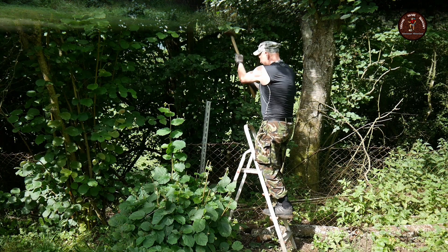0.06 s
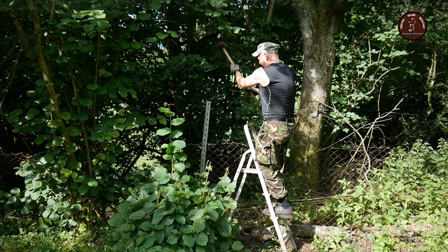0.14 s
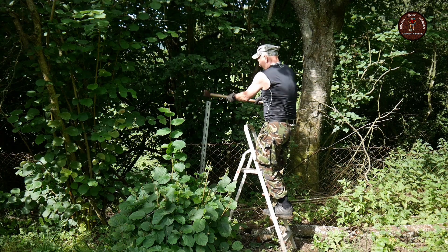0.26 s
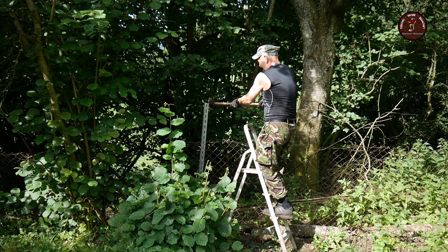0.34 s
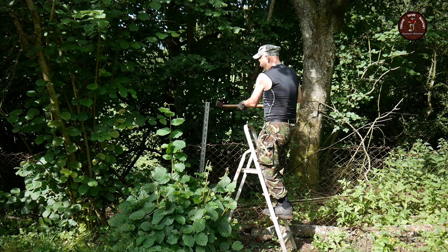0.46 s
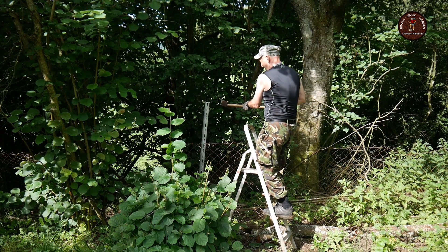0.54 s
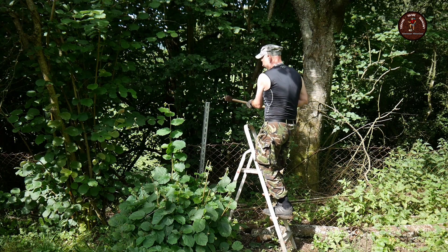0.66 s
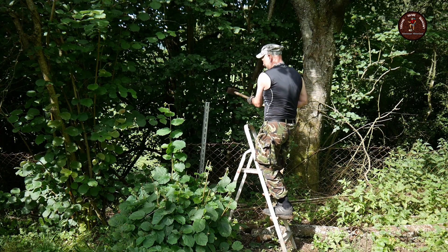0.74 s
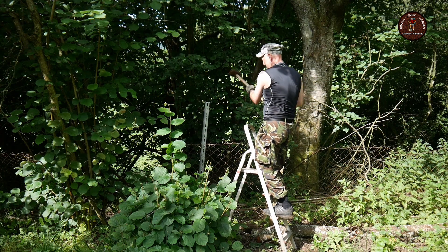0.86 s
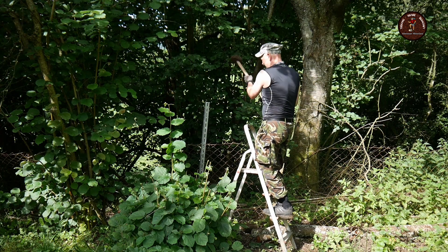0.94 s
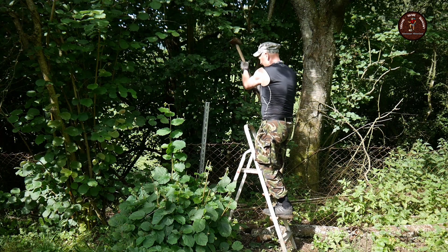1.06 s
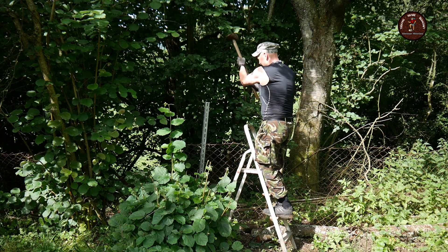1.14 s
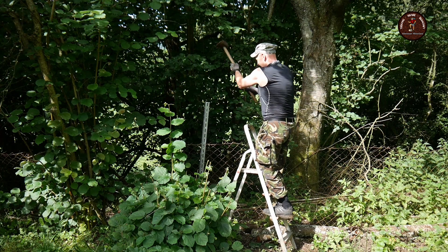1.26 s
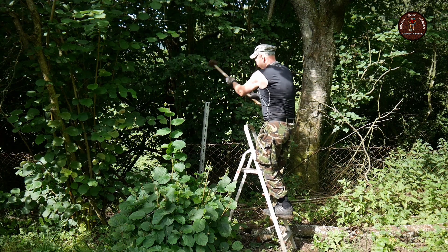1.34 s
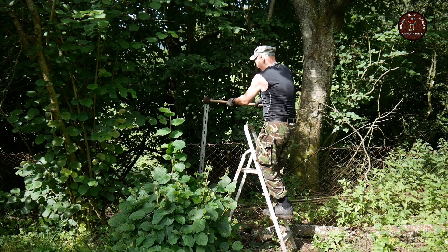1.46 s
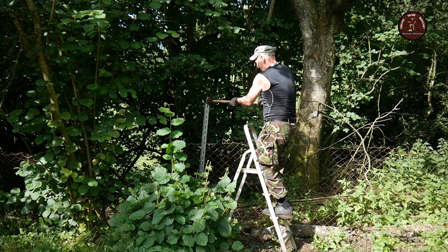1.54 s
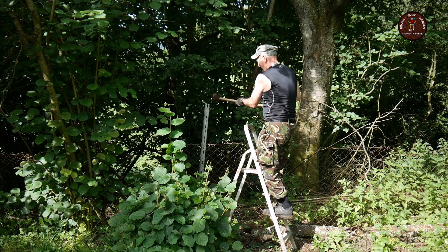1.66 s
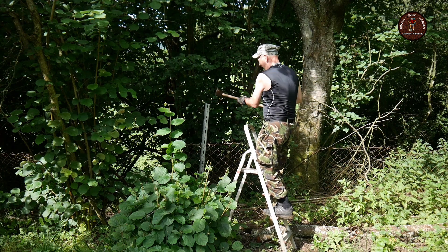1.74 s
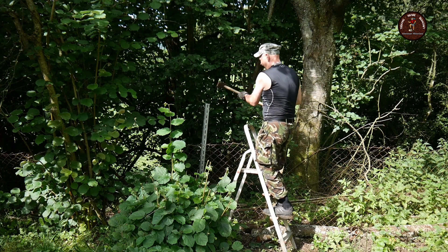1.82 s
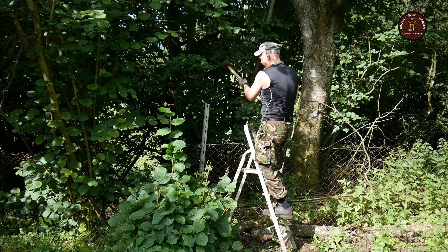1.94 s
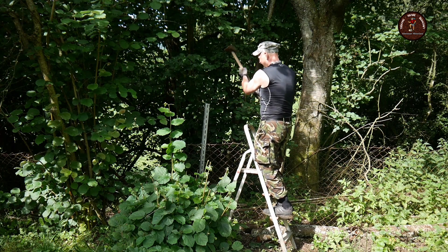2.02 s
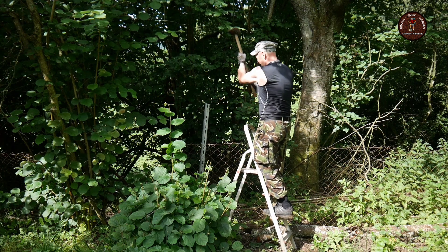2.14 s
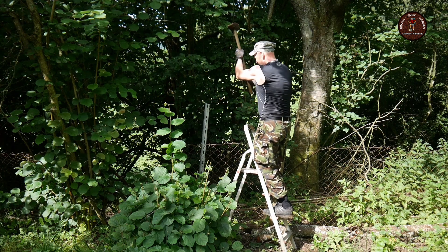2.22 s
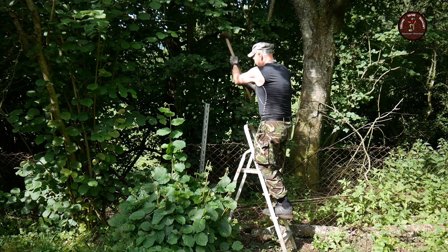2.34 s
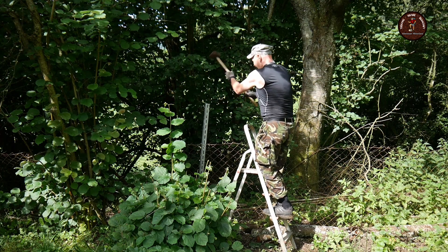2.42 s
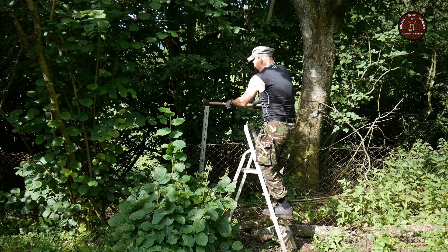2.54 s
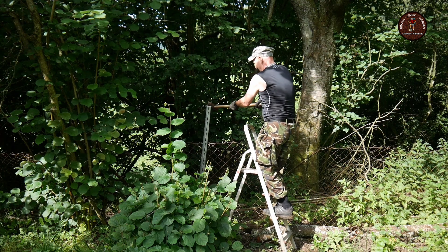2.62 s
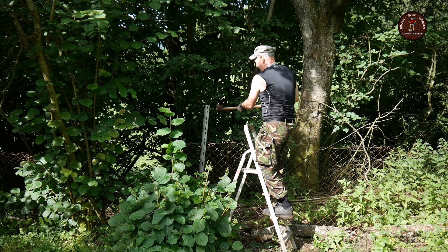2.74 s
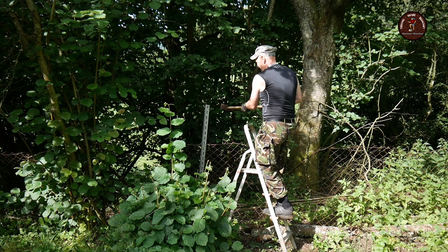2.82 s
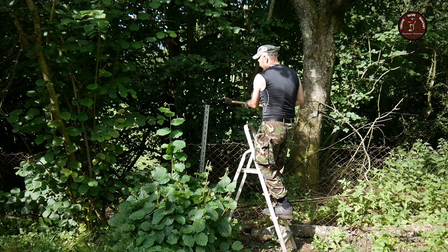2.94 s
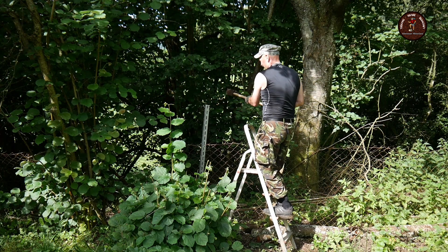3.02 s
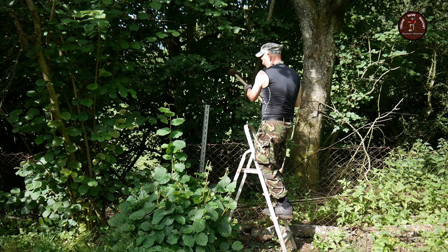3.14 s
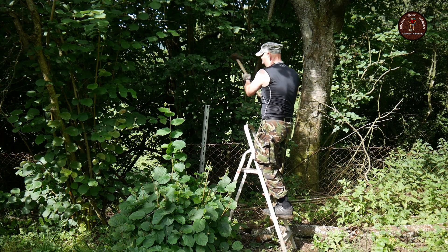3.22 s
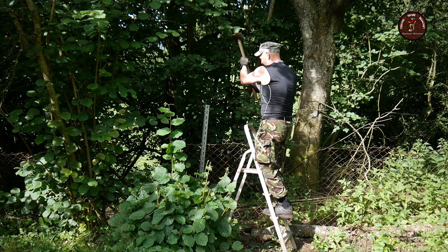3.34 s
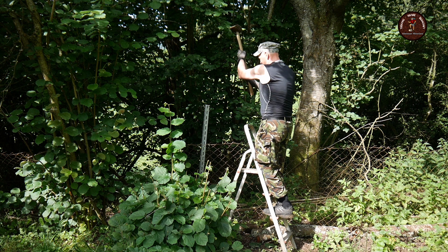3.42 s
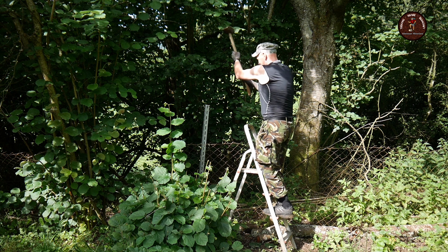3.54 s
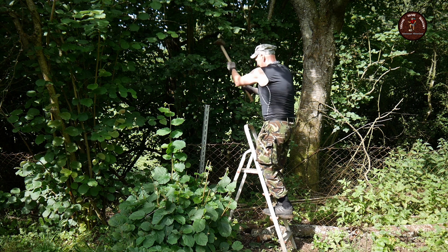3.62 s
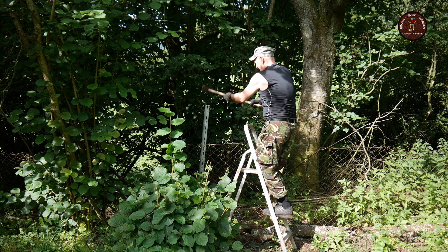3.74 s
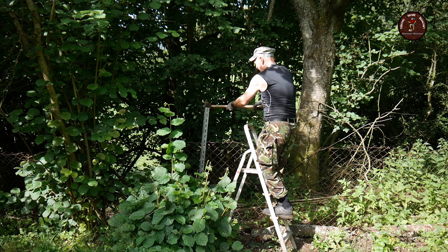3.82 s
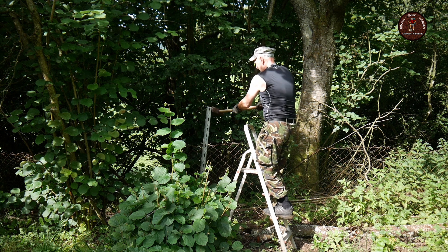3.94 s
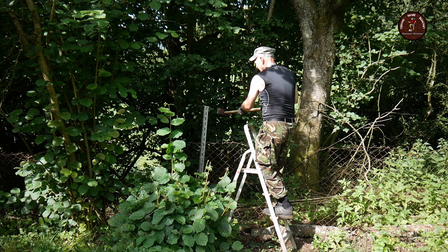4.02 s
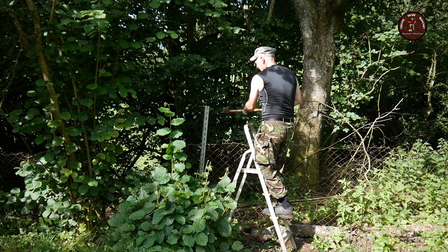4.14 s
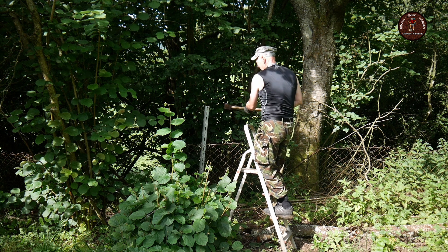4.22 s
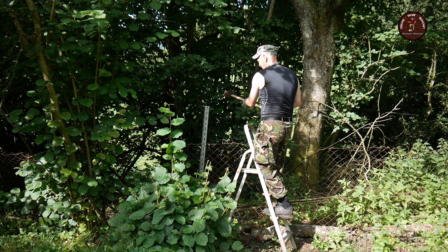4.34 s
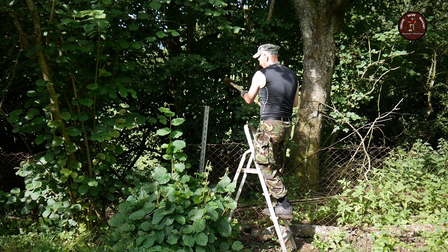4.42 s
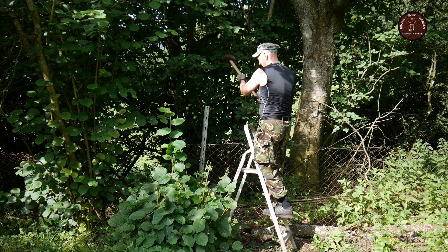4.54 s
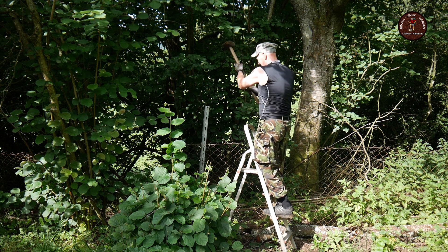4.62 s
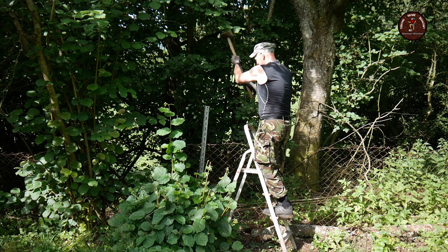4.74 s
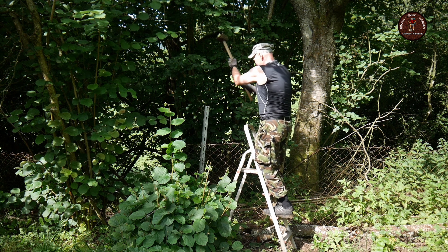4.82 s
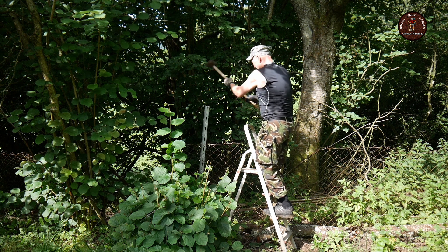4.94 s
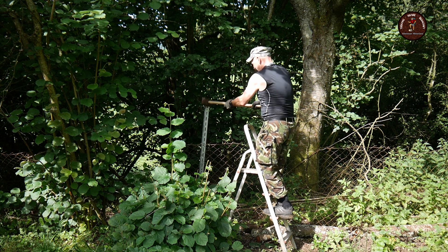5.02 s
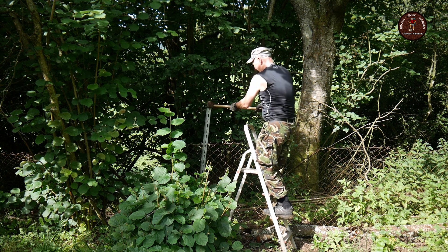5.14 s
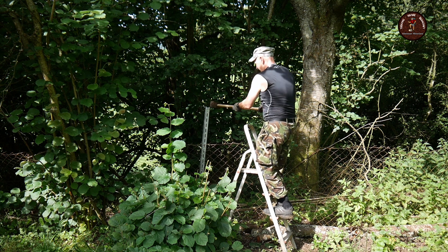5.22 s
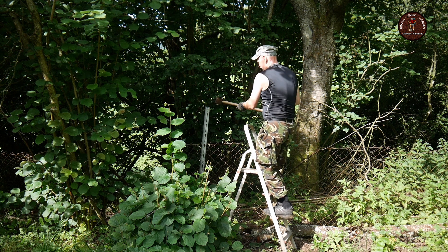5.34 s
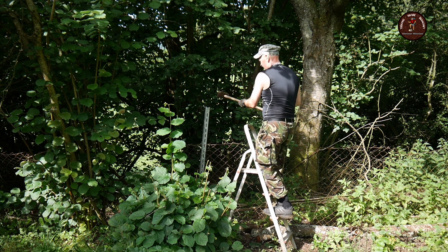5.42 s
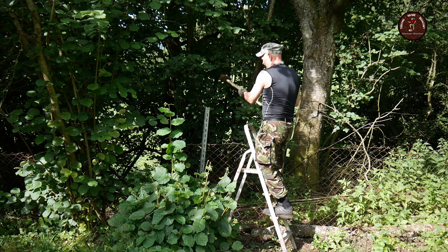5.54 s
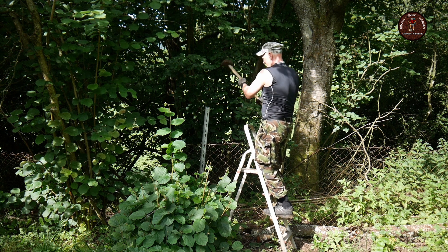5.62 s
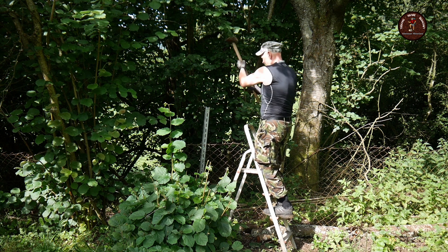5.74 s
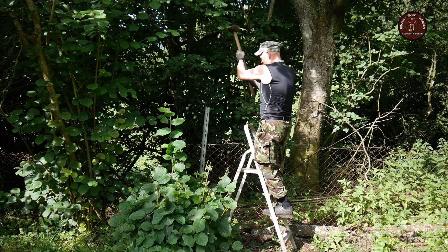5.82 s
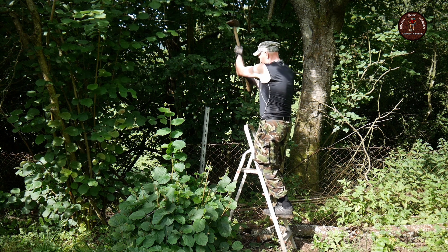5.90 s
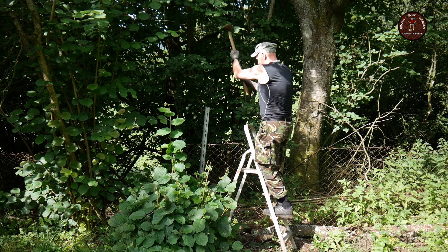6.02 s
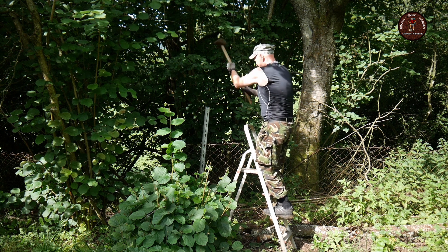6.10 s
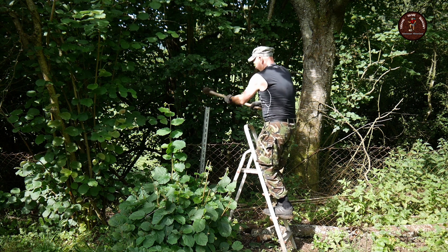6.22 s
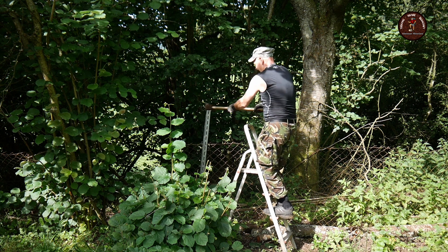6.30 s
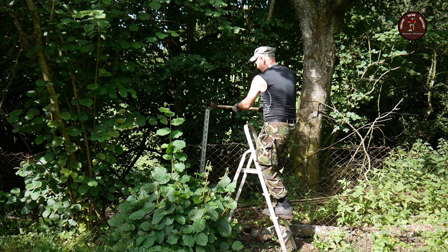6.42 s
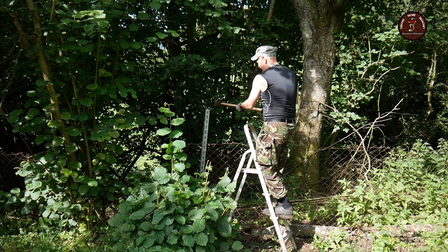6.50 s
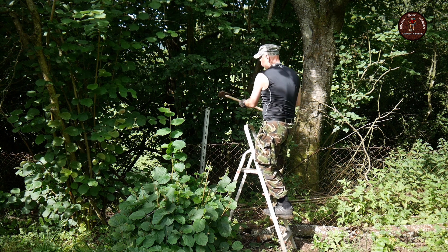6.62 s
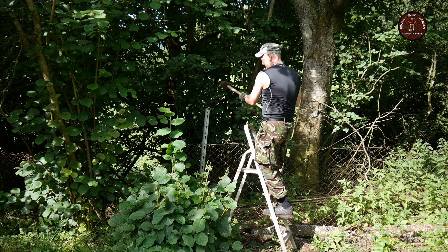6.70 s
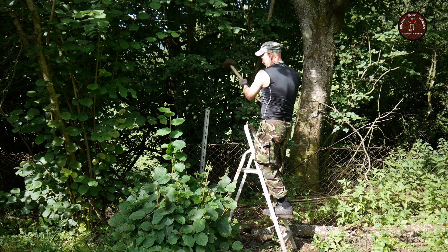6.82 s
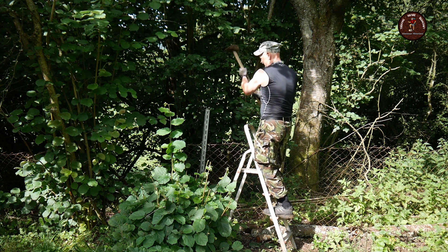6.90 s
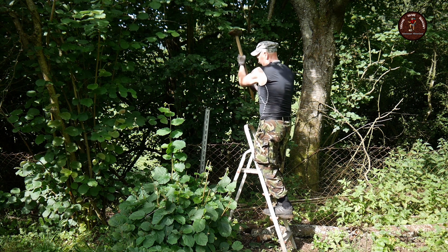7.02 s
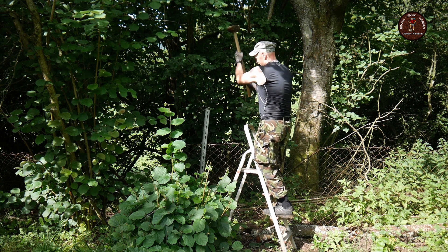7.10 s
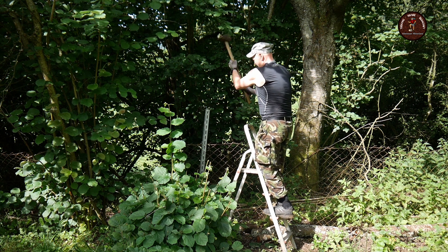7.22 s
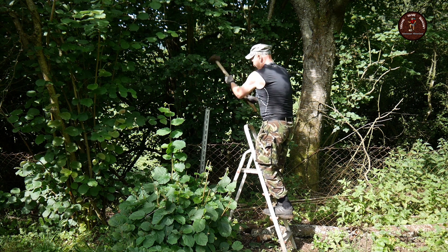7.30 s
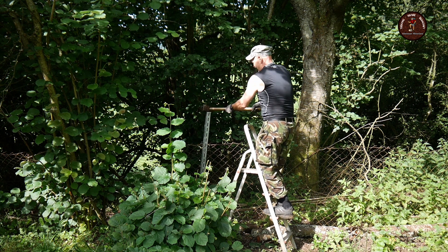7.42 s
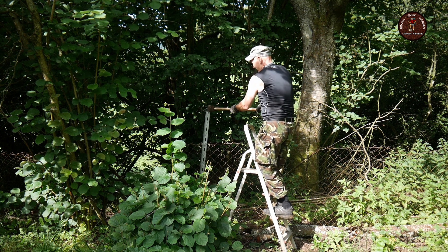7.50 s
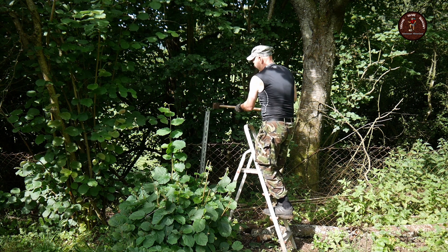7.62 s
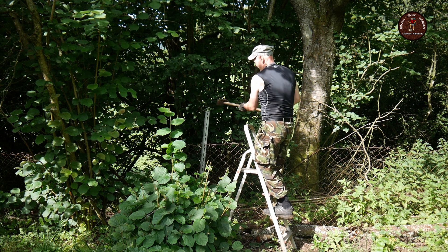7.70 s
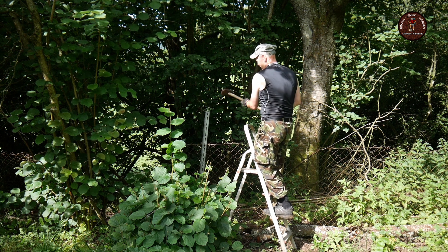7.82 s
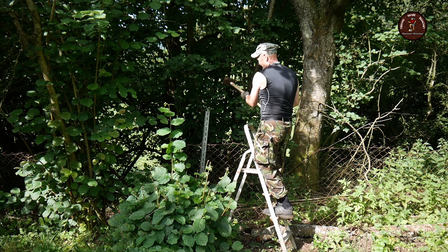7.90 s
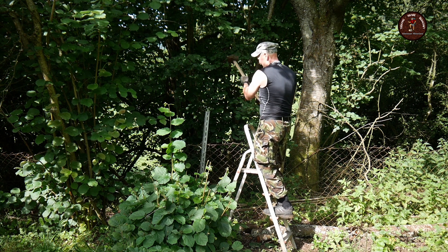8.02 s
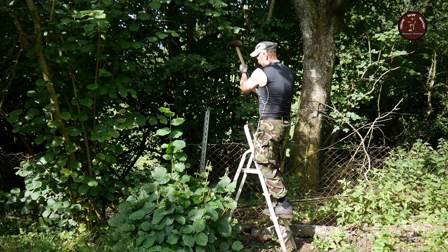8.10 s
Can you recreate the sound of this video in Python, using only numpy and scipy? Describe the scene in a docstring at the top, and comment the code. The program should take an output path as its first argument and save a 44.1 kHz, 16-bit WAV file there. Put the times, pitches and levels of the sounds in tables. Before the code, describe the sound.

A heavy hammer strikes a post with seven loud, spaced, ringing blows, fence wire shivering and trees echoing, over faint leaf and traffic noise.

```python
"""Far traffic, leaves and a faint hum lie under a wooded garden: drifting noise and a narrow noise band.
A post is still ringing from an earlier blow: dying sines, close in pitch, that beat; small noise puffs follow.
A heavy hammer then drives the post in with seven blows: noise crack, short sines, noise bands for the wire
fence and a scattered noise echo from the trees; each blow has its ring and one or two rebounds.
Late on come three thin bird chirps, sliding sines. The blows overload the microphone and clip."""
import sys
import numpy as np
from scipy import signal
from scipy.fft import rfft, irfft
from scipy.io import wavfile
from scipy.ndimage import uniform_filter1d

SR = 44100
rng = np.random.default_rng(int(sys.argv[2]) if len(sys.argv) > 2 else 0)


def transcribe(u):
    """Save the signal u as a 16-bit wav file named by the first command-line argument.

    u: samples, shape (n,) or (channels, n), limited to [-1, 1]; the rate is SR.
    q: integer samples, one column per channel.
    """
    v = np.clip(np.atleast_2d(u).T, -1, 1)
    q = np.round(v * 32767).astype(np.int16)
    wavfile.write(sys.argv[1], SR, q)


N = 359856  # length in samples


def amp(db):
    """Decibels to amplitude."""
    return 10 ** (np.asarray(db) / 20)


def unit(x):
    """Scale to rms 1."""
    return x / np.sqrt(np.mean(x ** 2) + 1e-20)


def read(points, hz):
    """Read a curve of (hz, value) points, straight over log frequency."""
    point_hz, value = np.transpose(points)
    return np.interp(np.log(hz + 1), np.log(point_hz + 1), value)


def add(mix, start_s, sound):
    """Lay a sound into the mix, cut at the end of the mix."""
    part = mix[round(start_s * SR):][:len(sound)]
    part += sound[:len(part)]


def coloured(seconds, gain):
    """Noise of rms 1 whose spectrum is shaped by gain(hz)."""
    size = round(seconds * SR)
    spectrum = rfft(rng.standard_normal(size)) * gain(np.fft.rfftfreq(size, 1 / SR))
    return unit(irfft(spectrum, size))


def hump(centre_hz, width_hz):
    """Resonance-like gain curve, width_hz wide at half its peak amplitude."""
    return lambda hz: 1 / (1 + (2 * (hz - centre_hz) / width_hz) ** 2)


def burst(db, gain, t60, rise=0.0015):
    """A puff of coloured noise that starts quickly and dies by 60 dB in t60 seconds."""
    t = np.arange(SR) / SR
    return amp(db - 60 * t / t60) * (1 - np.exp(-t / rise)) * coloured(1, gain)


# Colour of the far background: hz, relative level_db (per Hz)
WASH_COLOUR = [(12, -33), (25, -5), (60, -1), (120, -9.5), (200, -12.5), (290, -5.5), (400, -14),
               (520, -10), (950, -12.5), (1400, -18.5), (2000, -22.5), (2700, -33), (4000, -37.5),
               (14500, -42.5), (16200, -49.5)]
WASH_DB, WASH_FADE_DB_PER_S = -56, 0.21  # starting level of the 550-1500 Hz range, and its slow fall


def wash():
    """Far traffic and leaves: random short-time spectra whose level drifts in patches of pitch and time."""
    frames, hz = N // 256 + 5, np.fft.rfftfreq(1024, 1 / SR)
    real, imaginary, patches = rng.standard_normal((frames, 513, 3)).T
    patches = uniform_filter1d(patches, 10, axis=0)
    patches = unit(uniform_filter1d(patches, 16, axis=1))
    level_db = read(WASH_COLOUR, hz)[:, None] + 1.2 * patches
    spectra = (real + 1j * imaginary) * amp(level_db)
    noise = signal.istft(spectra, nperseg=1024, noverlap=768)[1][:N]
    middle = signal.sosfilt(signal.butter(4, (550, 1500), "bandpass", fs=SR, output="sos"), noise)
    fade = amp(WASH_DB - WASH_FADE_DB_PER_S * np.arange(N) / SR)
    return fade * noise / np.std(middle)


HUM_HZ, HUM_WIDTH_HZ, HUM_DB = 394, 5, -65.5


def hum():
    """A faint fuzzy tone: noise squeezed into a narrow band."""
    return amp(HUM_DB) * coloured(N / SR, hump(HUM_HZ, HUM_WIDTH_HZ))


# Fixed modes of the post, in order lower twin, upper twin, low overtone, high overtone, ping: pitch_hz, t60_s
POST_MODES = [(474.6, 3.5), (511, .3), (1270, 1.1), (3390, 1.1), (7757, .8)]
# Blow before the start, only its ring is left: start_s, in_step_s (all tones in step, after the blow),
# main_db, lower_twin_db, upper_twin_db, low_overtone_db, high_overtone_db, ping_db
EARLIER_RING = (-.8, -2.1, -15, -33.5, -36, -62, -69, -55.5)
MAIN_HZ, RISE_FROM_S, RISE_HZ_PER_S = 482.9, 3, 0.42  # later blows ring higher as the post sinks in
MAIN_T60, BLOOM_S = 0.93, 0.35  # s: decay of the main tone, and time constant of its growth
FLUTTER_DB = 3.5  # rms


def post():
    """Dying modes; close tones beat, upper ones flutter as the post sways against the wire, blows choke the ring."""
    clock, out = np.arange(N) / SR, np.zeros(N)
    rings = [EARLIER_RING] + [(start_s, *row[-7:]) for start_s, *row in BLOW_TABLE]
    ends = [row[0] for row in BLOW_TABLE] + [N / SR]
    for (start_s, in_step_s, main_db, *mode_levels_db), end_s in zip(rings, ends):
        main_hz = MAIN_HZ + RISE_HZ_PER_S * max(start_s - RISE_FROM_S, 0)
        now = (clock >= start_s) & (clock < end_s)
        t = clock[now] - start_s
        growth = 1 - np.exp(-t / BLOOM_S)
        main_tone = np.sin(2 * np.pi * main_hz * (t - in_step_s))
        tones = amp(main_db - 60 * t / MAIN_T60) * growth * main_tone
        for (mode_hz, t60), mode_db in zip(POST_MODES, mode_levels_db):
            flutter_db = FLUTTER_DB * (mode_hz > 1000) * coloured(len(t) / SR, hump(0, 30))
            level = amp(mode_db + flutter_db - 60 * t / t60)
            tones += level * np.sin(2 * np.pi * mode_hz * (t - in_step_s))
        out[now] = tones * (1 - np.exp(-t / 0.0033))
    return out


# Small ticks and bumps around the post; the narrow row near 3420 Hz is a late swell of the post's high overtone:
# start_s, level_db, centre_hz, width_hz, t60_s
PUFF_TABLE = [(0.305, -56, 3000, 1450, 0.017), (0.904, -57.5, 8000, 4000, 0.12),
              (0.907, -62.5, 3420, 120, 0.22), (1.622, -35, 700, 120, 0.077),
              (2.060, -58.5, 7000, 1600, 0.3), (3.095, -58, 11260, 5000, 0.037),
              (3.264, -55, 2430, 2560, .08), (3.474, -37.5, 108.5, 89.8, 0.13),
              (3.513, -43, 71.4, 60, 0.089), (4.499, -60.5, 8900, 6000, 0.072),
              (4.847, -55, 281, 150, 0.086), (5.765, -56.5, 2200, 1500, 0.073)]


def small_puff(level_db, centre_hz, width_hz, t60):
    """A tick, bump or overtone swell: one decaying puff of noise around a resonance."""
    return burst(level_db, hump(centre_hz, width_hz), t60, rise=0.0023)


# Colour of the crack noise: hz, relative level_db (per Hz)
CRACK_COLOUR = [(88, -46.5), (150, -11.5), (1360, -8.5), (2100, -1.5), (3920, -10.5), (9080, -7),
                (10600, -19), (14500, -13), (16000, -32)]
HEAD_HZ = 8934  # the same for every blow
CLANG_HZ, CLANG_T60, CLANG_DB = 4540, 0.025, 31.5  # Hz, s, dB over the high fence level


def contact(crack_db, thud_db, knock_hz, knock_db, head_db, high_db):
    """Crack of contact, thud, short clang, singing hammer head and a knock that peaks last."""
    t = np.arange(SR // 10) / SR
    crack_shape = (1 - np.exp(-t / 0.0001)) / (1 + (t / 0.0036) ** 4)
    hit = amp(crack_db) * crack_shape * coloured(0.1, lambda hz: amp(read(CRACK_COLOUR, hz)))
    head_shape = np.exp(-((t - 0.0018) / 0.00067) ** 2)
    hit += amp(head_db) * np.sin(2 * np.pi * HEAD_HZ * t) * head_shape
    # bending waves run fastest in the treble, so the knock glides down to knock_hz and peaks late
    knock_cycles = knock_hz * (t - 0.00041 * np.exp(-t / 0.0027))
    knock_shape = np.exp(-((t - 0.0034) / 0.00062) ** 2)
    hit += amp(knock_db) * np.sin(2 * np.pi * knock_cycles) * knock_shape
    hit -= amp(thud_db) * np.sin(2 * np.pi * 750 * t) * np.exp(-t / 0.0013)
    clang_level = amp(high_db + CLANG_DB - 60 * t / CLANG_T60) * (1 - np.exp(-t / 0.002))
    hit += clang_level * np.sin(2 * np.pi * CLANG_HZ * t)
    return hit


# Clusters of close wire modes: centre_hz, width_hz, level_db (over the blow's low or high fence level), t60_s
FENCE_MODES = [(1600, 200, -3.5, 0.88), (1958, 260, -0.26, 1.3), (2100, 180, -8, 1.1), (2284, 220, -3, 1.2),
               (3040, 270, -2, 0.9), (3360, 210, -1.5, 0.95), (4510, 320, 4, 0.9), (5700, 200, -14, 0.55),
               (6680, 250, -8, 1), (8200, 200, -5.5, 0.46)]


def fence(low_db, high_db):
    """The wire fence shivers: each cluster of modes is a decaying noise band with a sharper clang in front."""
    out = np.zeros(SR)
    for k, (centre_hz, width_hz, db, t60) in enumerate(FENCE_MODES):
        level_db = db + (low_db if k < 4 else high_db)  # the first four clusters are the low ones
        band = hump(centre_hz, width_hz)
        out += burst(level_db, band, t60, rise=0.005)
        out += burst(level_db + 12, band, 0.15 * t60, rise=0.00067)  # the first clang dies quickly
    return out


# Colour of the echo before its brightness tilt: hz, relative level_db (per Hz)
ECHO_COLOUR = [(50, -39.5), (90, -17), (350, -2.5), (1300, -7.5), (2000, -8), (2700, -11.5), (4500, -11),
               (8300, -13), (10500, -22.5), (12000, -20), (15200, -21), (15900, -46)]
# Decay of the near echo before the blow's length factor: hz, t60_s
ECHO_DECAY = [(100, 0.16), (400, 0.58), (1200, 0.65), (3000, 0.63), (6000, 0.54), (10000, 0.5),
              (13500, 0.22), (16000, 0.3)]
FAR_DB, FAR_LONGER = -34, 4.5  # far wood: dB relative to the near echo, factor on its length
# A louder echo is brighter: tilt in dB per octave at the usual level, and its change per dB above that
BRIGHT_DB, BRIGHT_PER_DB, USUAL_ECHO_DB = 3, 0.33, -25


def echo(echo_db, longer):
    """Trunks and leaves scatter the crack back; each band dies at its own speed, the far wood softer and longer."""
    hz, t, z = signal.stft(rng.standard_normal(2 * SR), SR, nperseg=256)
    bright_db = BRIGHT_DB + BRIGHT_PER_DB * (echo_db - USUAL_ECHO_DB)
    colour = amp(read(ECHO_COLOUR, hz) + bright_db * np.log2((hz + 100) / 3000))[:, None]
    fall_db = -60 * t / (longer * read(ECHO_DECAY, hz)[:, None])
    patches = uniform_filter1d(rng.standard_normal(z.shape), size=2, axis=0)
    patches = uniform_filter1d(patches, size=14, axis=1)
    z = z * amp(2.2 * unit(patches))  # the scatter is uneven in pitch and time
    near_and_far = amp(fall_db) + amp(FAR_DB + fall_db / FAR_LONGER)
    scatter = signal.istft(z * unit(colour) * near_and_far, SR, nperseg=256)[1]
    early_boost = 1 + 2.2 * np.exp(-np.arange(len(scatter)) / SR / 0.0077)
    return amp(echo_db) * scatter * early_boost


# Hammer blows: start_s, crack_db, thud_db, knock_hz, knock_db, hammer_head_db, echo_db, echo_length (factor),
# low_fence_db, high_fence_db; then the ring of the post: in_step_s (all tones in step, after the blow),
# main_db, lower_twin_db, upper_twin_db, low_overtone_db, high_overtone_db, ping_db
BLOW_TABLE = [(0.3707, -6, -3.5, 1643, -8.5, -6, -24.5, 0.99, -56, -55, 0.074, -18, -38, -28, -62.5, -50.5, -51),
              (1.521, -8, -7.5, 1884, 3, -16.5, -29.5, 1.09, -41.5, -42.5, 0.042, -15, -42, -31, -60, -59, -49),
              (2.6173, -5, -15, 1975, 0, -2, -27.5, 1.29, -39, -40, 0.05, -22, -53, -34, -58, -60, -54.5),
              (3.8656, -4.5, -8.5, 2102, -4.5, -12, -26, 1.31, -39.5, -43.5, .11, -20, -40, -27.5, -64.5, -52.5, -62),
              (5.125, -7, -8.5, 2083, 0.5, -1.5, -27, 1.1, -39.5, -58, .021, -16, -45.5, -25.5, -55.5, -66.5, -38.5),
              (6.3470, -5.5, -12, 2230, -17, 0.5, -24, 0.98, -41, -38.5, .07, -29, -47, -44, -44, -64.5, -49),
              (7.5028, -5.5, -7.5, 1766, -2.5, -4, -24.5, 0.91, -35, -44, .025, -18.5, -60, -30.5, -48.5, -71.5, -38.5)]


def blow(crack_db, thud_db, knock_hz, knock_db, head_db, echo_db, longer, low_db, high_db, *ring):
    """Contact sets off a low noise thud, the fence and the echo; post() plays the ring."""
    out = echo(echo_db, longer)
    add(out, 0, contact(crack_db, thud_db, knock_hz, knock_db, head_db, high_db))
    add(out, 0, burst(thud_db - 13, hump(280, 190), 0.07, rise=0.0033))
    add(out, 0, fence(low_db, high_db))
    return out


# The hammer falls back on the post: start_s, thump_db, knock_db, click_db
REBOUND_TABLE = [(0.4440, -30, -66, -25.5), (1.5980, -34.5, -58, -38), (2.6919, -42, -25, -33),
                 (2.7592, -58, -26, -37), (3.9497, -51, -18, -27.5), (3.9775, -57, -25.5, -35),
                 (5.2037, -34.5, -27, -34), (6.4200, -39.5, -44, -60), (7.5790, -33.5, -37, -51),
                 (7.688, -54, -43, -49)]
SNAP_DB = 7  # snap over the knock level
THUMP_HZ, THUMP_S = 127.4, 0.0043  # the push into the ground: pitch, and time to peak and decay


def rebound(thump_db, knock_db, click_db):
    """One sharp snap and a late knock as in the blow, then a short rattle over a thump in the ground."""
    t = np.arange(SR) / SR
    snap = -np.sin(2 * np.pi * 2600 * t) * np.exp(-t / 0.0008)
    late = np.sin(2 * np.pi * 2000 * t) * np.exp(-((t - 0.0034) / 0.00037) ** 2)
    knock = amp(knock_db + SNAP_DB) * (snap + 0.44 * late)
    knock += burst(knock_db - 3.5, hump(2380, 2500), 0.11, rise=0.0001)
    thump_shape = t / THUMP_S * np.exp(1 - t / THUMP_S)
    thump = amp(thump_db) * np.sin(2 * np.pi * THUMP_HZ * t) * thump_shape
    rattle = burst(click_db, hump(7900, 4700), 0.15, rise=0.0058)
    return knock + thump + rattle


# Bird chirps: start_s, length_s, from_hz, to_hz, level_db
CHIRP_TABLE = [(6.16, .186, 2390, 4330, -78), (6.238, 0.095, 3270, 3664, -68),
               (7.14, 0.15, 5970, 4660, -75)]


def chirp(length, from_hz, to_hz, level_db):
    """A thin whistle that slides in pitch, made slightly fuzzy by a random waver."""
    t = np.arange(0, length, 1 / SR)
    waver = 1 + 0.022 * unit(uniform_filter1d(rng.standard_normal(len(t)), 100))
    hz = (from_hz + (to_hz - from_hz) * t / length) * waver
    swell = np.sqrt(np.sin(np.pi * t / length))
    return amp(level_db) * np.sin(2 * np.pi * np.cumsum(hz) / SR) * swell


def scene():
    """Background and post run throughout; every other sound is laid in at its time."""
    mix = wash() + hum() + post()
    sources = ((PUFF_TABLE, small_puff), (BLOW_TABLE, blow), (REBOUND_TABLE, rebound), (CHIRP_TABLE, chirp))
    for table, source in sources:
        for start_s, *settings in table:
            add(mix, start_s, source(*settings))
    return np.array([mix, mix])


EDGE_HZ = 16150  # upper band limit


def record(dry):
    """The microphone drops the deepest bass and clips the peaks; left and right differ slightly."""
    heard = signal.sosfilt(signal.butter(2, 30, "highpass", fs=SR, output="sos"), dry[0])
    clipped = np.clip(heard, -0.94, 0.94)
    z = signal.stft(clipped, nperseg=512)[2]
    scrambled = z * np.exp(2j * np.pi * rng.random(z.shape))  # random phases
    side = amp(-28.5) * signal.istft(scrambled, nperseg=512)[1][:N]
    side += amp(-73.5) * rng.standard_normal(N)
    left_right = np.array([clipped + side, clipped - side])
    band_limit = signal.firwin(401, EDGE_HZ, window=("kaiser", 7), fs=SR)
    return signal.oaconvolve(left_right, band_limit[None], "same")


dry = scene()
out = record(dry)
transcribe(out)
```